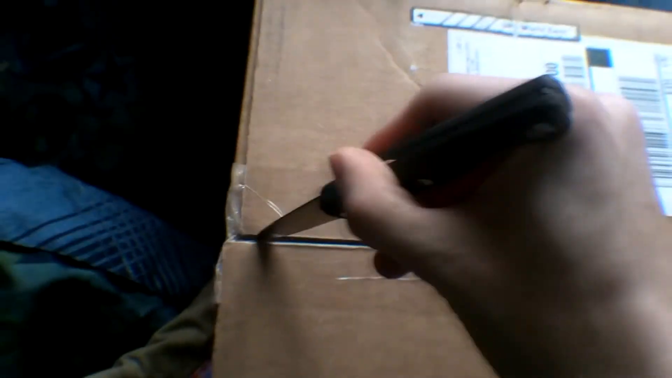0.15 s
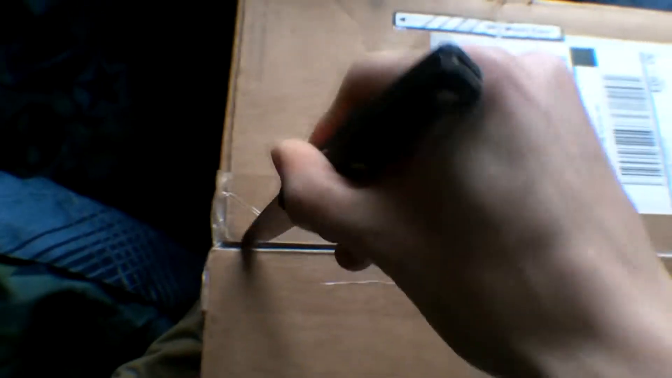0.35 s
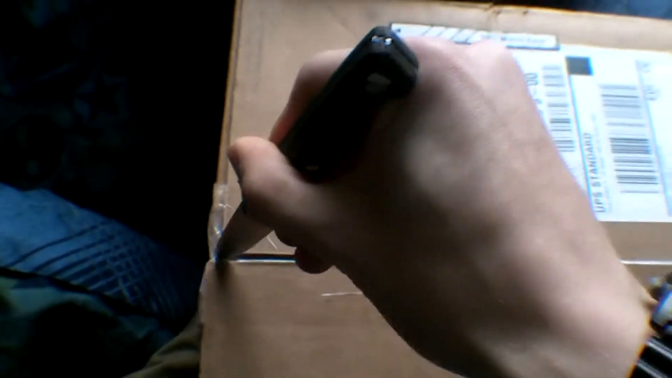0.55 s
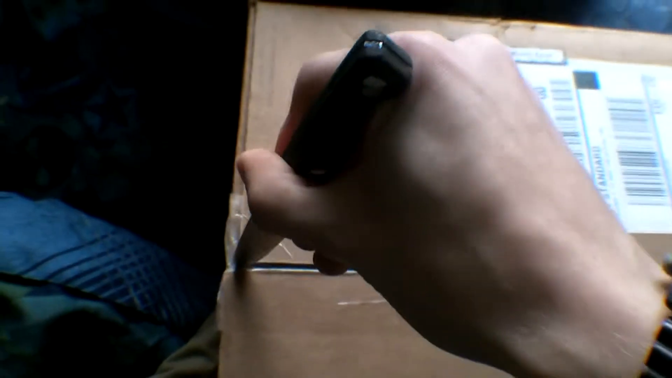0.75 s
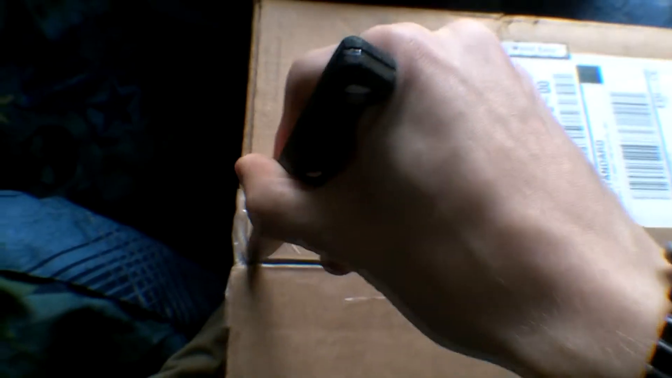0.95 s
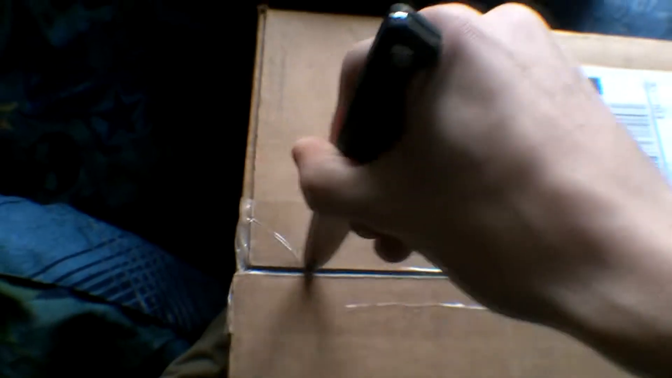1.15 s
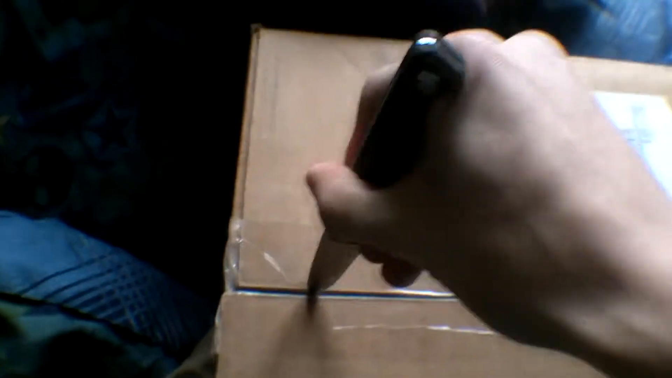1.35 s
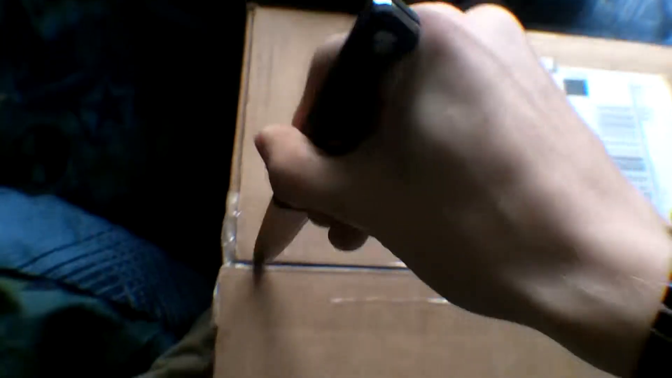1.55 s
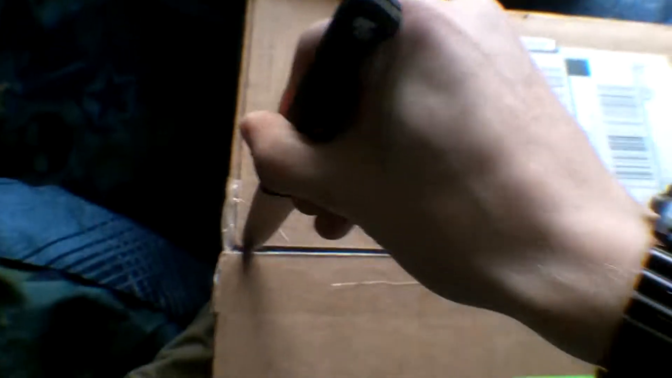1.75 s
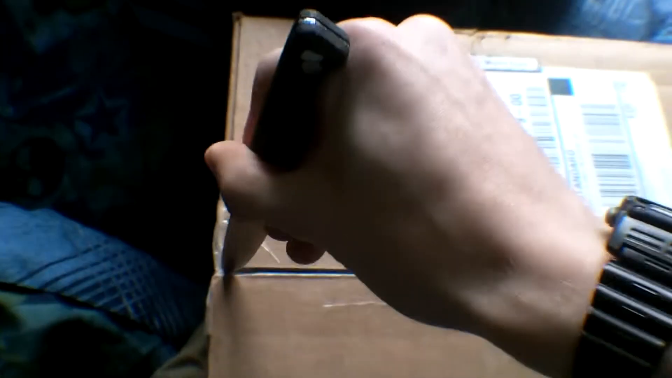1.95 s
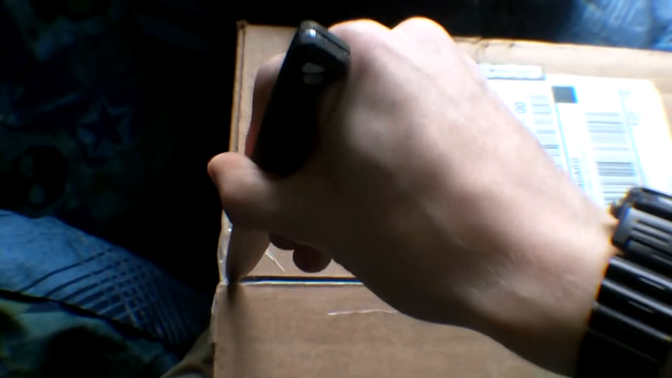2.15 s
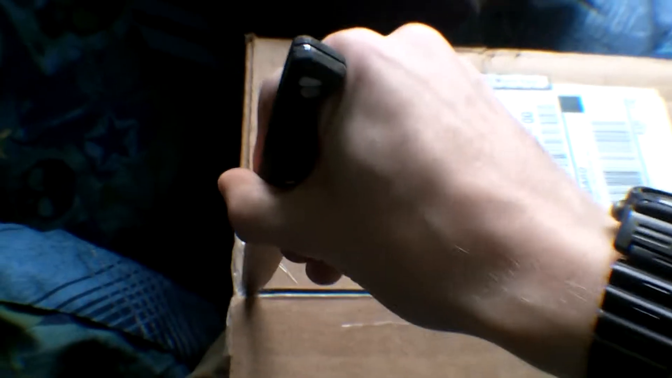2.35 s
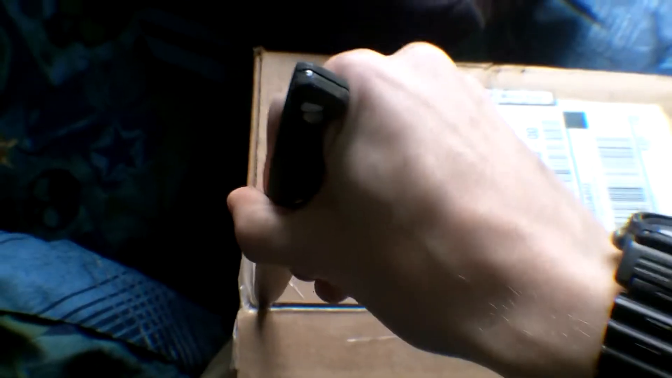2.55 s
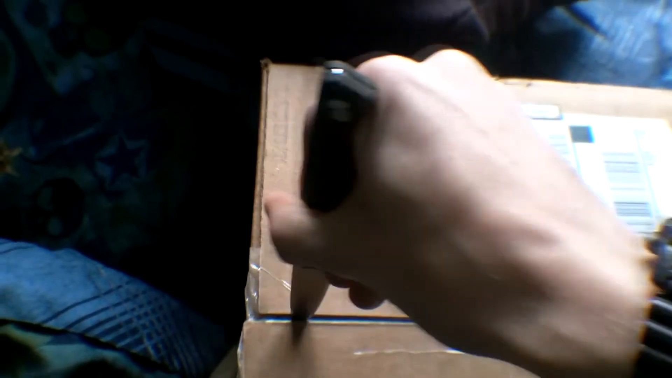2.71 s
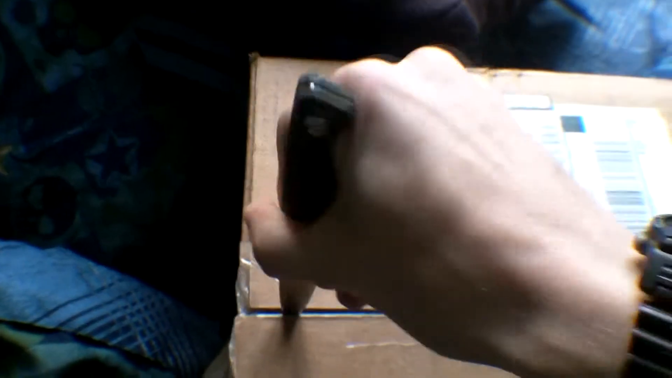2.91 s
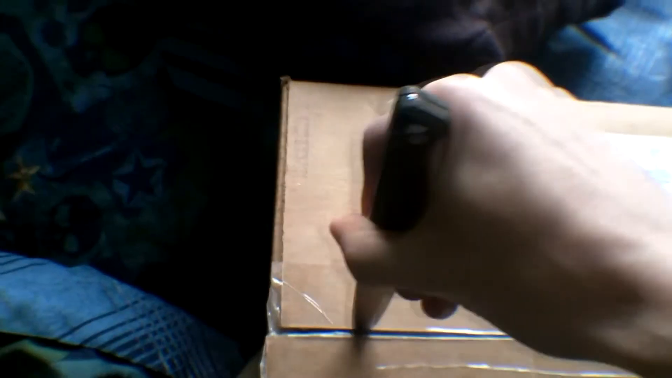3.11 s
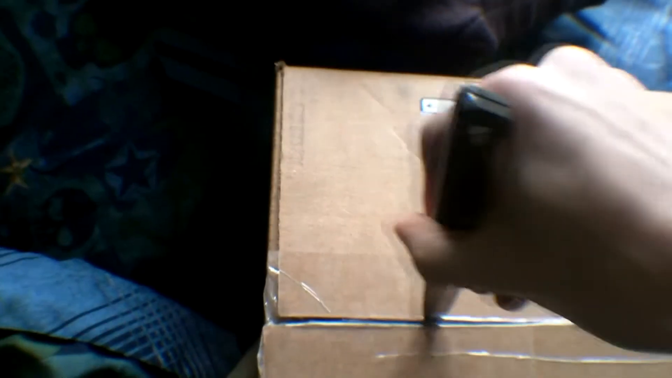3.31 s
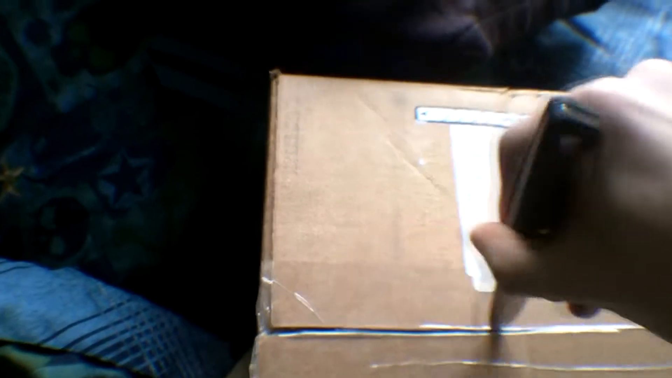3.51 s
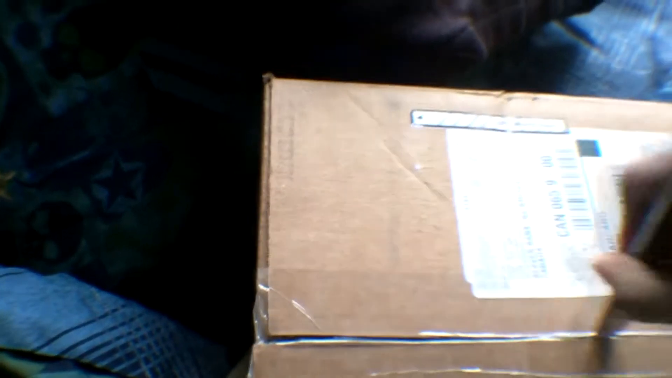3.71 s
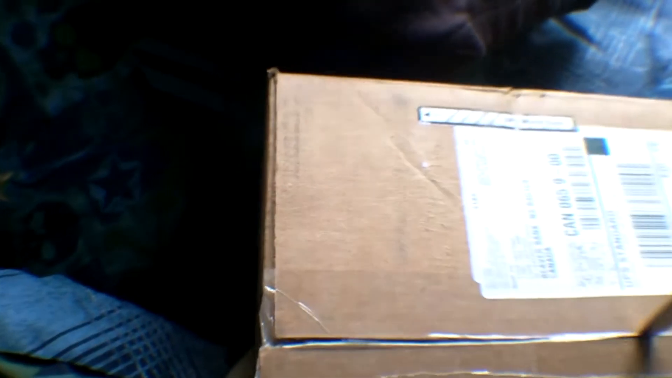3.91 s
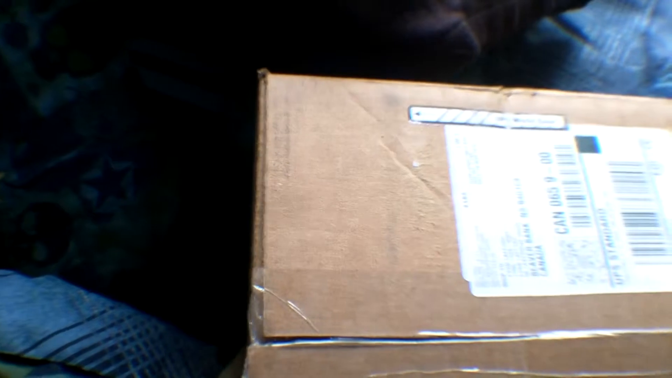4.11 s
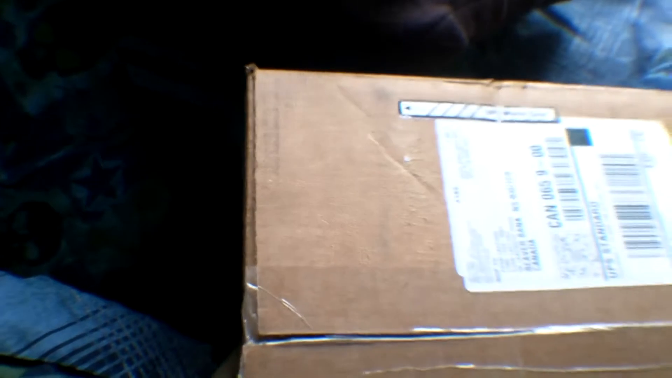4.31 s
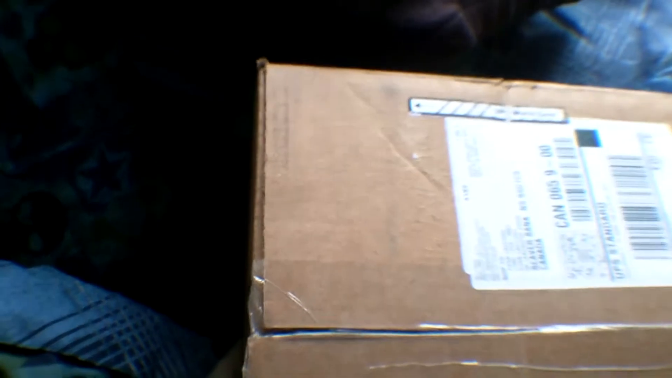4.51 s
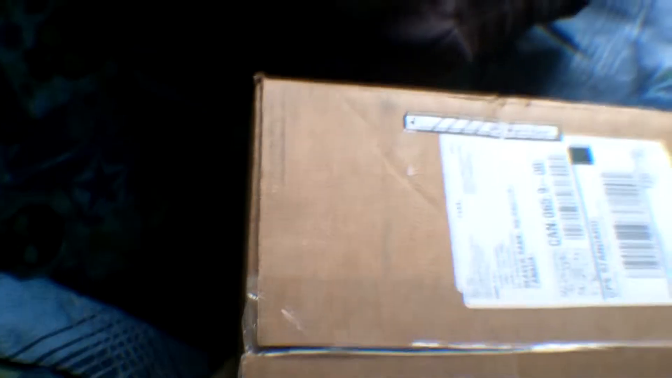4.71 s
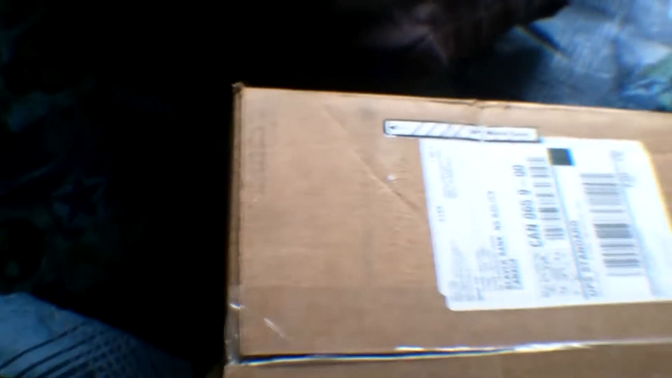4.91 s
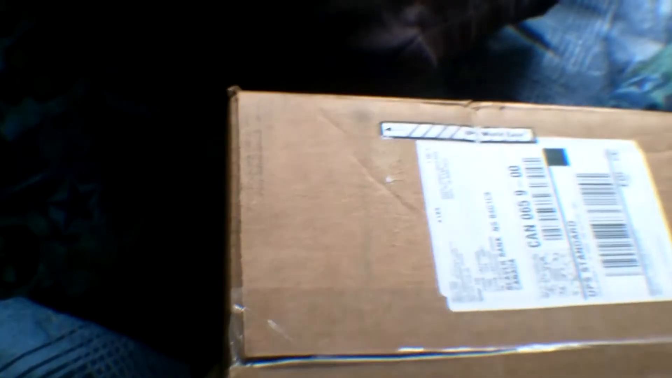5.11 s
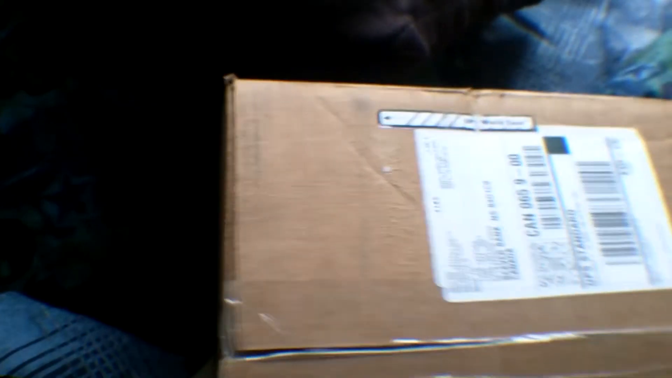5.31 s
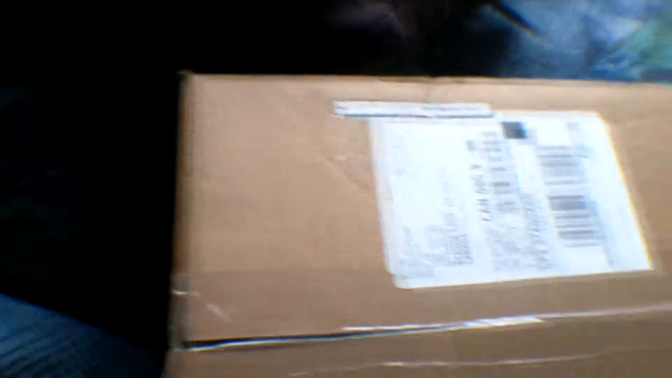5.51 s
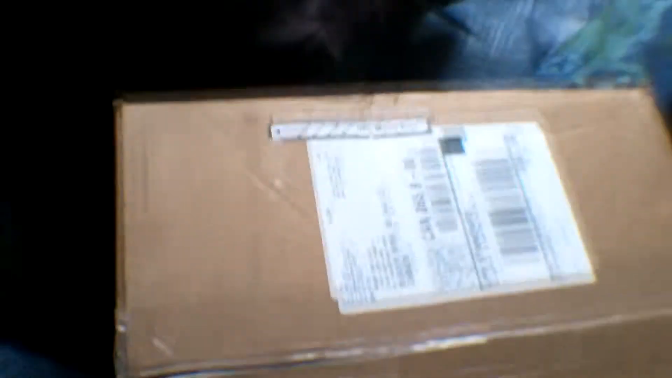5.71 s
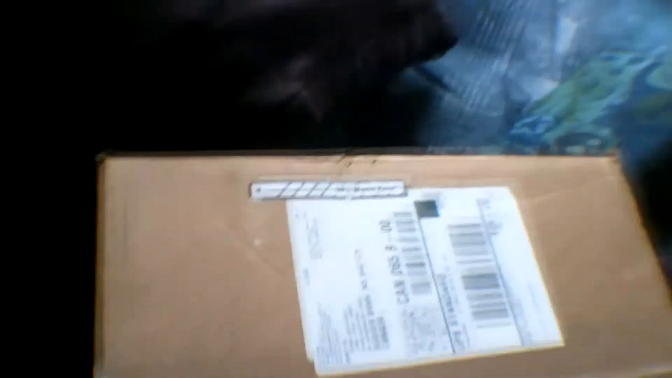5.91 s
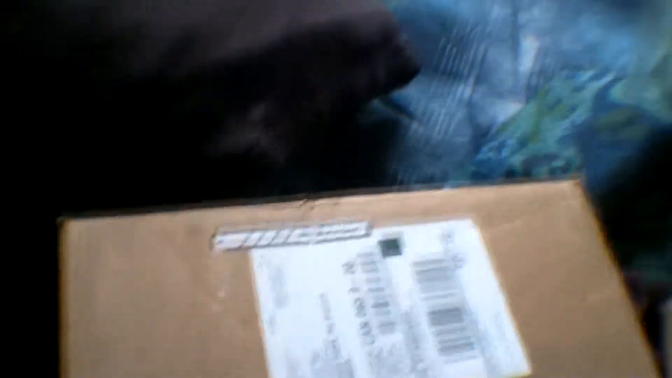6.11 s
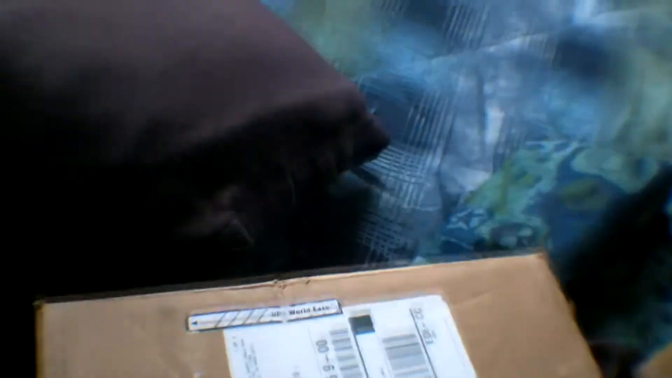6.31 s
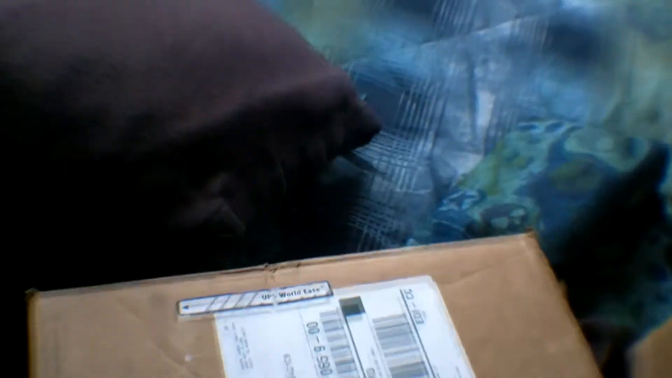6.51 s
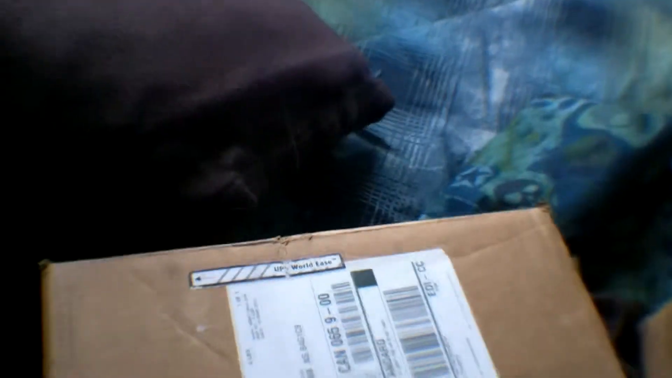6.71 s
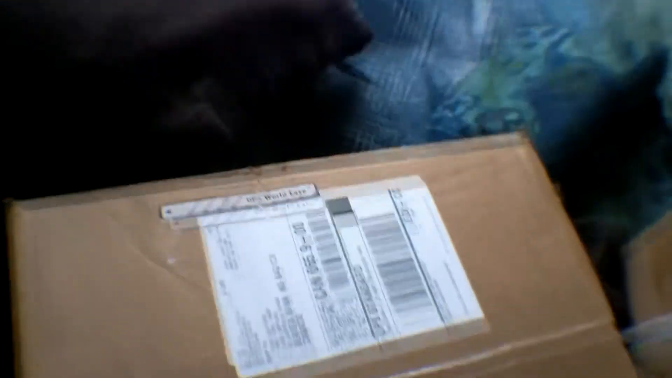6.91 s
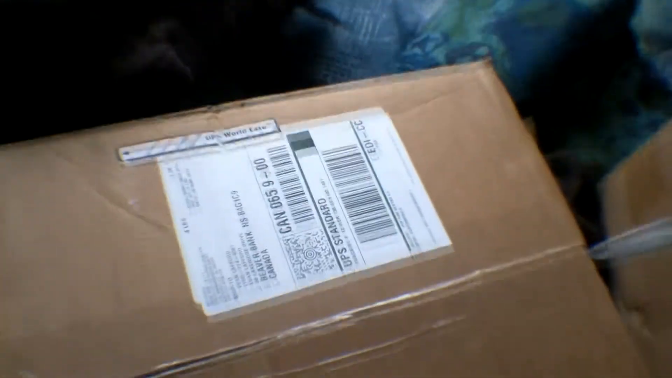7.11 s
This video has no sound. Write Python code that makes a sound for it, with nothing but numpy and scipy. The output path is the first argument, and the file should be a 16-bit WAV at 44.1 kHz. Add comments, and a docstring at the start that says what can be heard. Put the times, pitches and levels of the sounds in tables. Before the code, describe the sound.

Close and dry in a small furnished room, heard through a small bright microphone with steady soft hiss and a barely audible fan whine. At 0.1 s a quick cluster of crisp tape ticks and a small scrape, then lighter clicks around 0.5, a pair at 1.1-1.2, one sharper metallic tick at 1.6, and faint ones near 1.75 and 2.0. At 2.75 s comes the loudest event: a hard, bright snap with a hollow cardboard knock as the blade pierces. From 3.1 to 4.0 s the tape is slit in rapid, gritty crackles and rips over low panel thuds, ending in a strong pop at 4.0. From 4.3 to 5.2 s softer scuffs and rasps accompany the box shifting, with a brighter scrape at 4.7. A firm crackling knock lands at 5.4, then near quiet until small tape ticks and faint rustles from 6.5 to 7.15 s.

```python
"""Knife opening a taped cardboard box

Close by in a small soft room, a knife pokes at, pierces and slits packing tape; then the box is shifted.
Snaps of tape and dense stick-slip grains ring damped modes of the tape, the blade and the hollow box.
Panel thuds are single damped modes; behind lie shaped-noise hiss and a faint fan whine of sine tones.
A small built-in microphone colours everything with a treble peak and narrow notches."""
import sys
import numpy as np
from scipy import signal
from scipy.fft import rfft, irfft
from scipy.io import wavfile
from scipy.ndimage import uniform_filter1d

SR = 44100
rng = np.random.default_rng(int(sys.argv[2]) if len(sys.argv) > 2 else 0)


def to_wav(sig):
    """Store sig (one row per channel, or 1-D mono) as 16-bit WAV at the path in sys.argv[1].

    Samples outside -1..1 are clipped; the rate is SR.
    """
    pcm = np.clip(np.atleast_2d(sig), -1, 1) * 32767
    pcm = np.round(pcm).astype(np.int16)
    wavfile.write(sys.argv[1], SR, pcm.T)  # frames by channels


N = 315315  # samples

# resonances of the blade: pitch_hz, width_hz, relative level_db
BLADE_MODES = [(4855, 1260, 1.5), (5630, 690, -2), (6500, 1930, -0.5), (8470, 3100, -7),
               (11050, 3500, -7.5), (14400, 5000, -47)]
# resonances of the box flaps: pitch_hz, width_hz, relative level_db
FLAP_MODES = [(240, 123, -0.5), (300, 110, 4), (409, 260, 3), (573.4, 62, -2), (627, 224, -4.5),
              (1006, 310, -7), (1474, 750, -9.5)]


def gain_of(db):
    """Decibels to gain."""
    return 10 ** (np.asarray(db) / 20)


def evened(x):
    """Scales to rms 1."""
    return x / np.sqrt(np.mean(x ** 2) + 1e-20)


def read(points, hz):
    """A spectrum read on a log-frequency axis."""
    f, value = np.transpose(points)
    return np.interp(np.log(hz + 1), np.log(f + 1), value)


def add(mix, s, sound):
    """Mixes a sound in at s seconds."""
    part = mix[round(s * SR):][:len(sound)]
    part += sound[:len(part)]


def ring(modes, size=4096):
    """Impulse response of damped modes that swell in softly (steep skirts), energy 1."""
    t = np.arange(size) / SR
    body = np.zeros(size)
    for k, (hz, width, db) in enumerate(modes):
        swell_and_decay = width ** 1.5 * t * np.exp(-np.pi * width * t)
        body += (-1) ** k * gain_of(db) * swell_and_decay * np.sin(2 * np.pi * hz * t)
    return body / np.linalg.norm(body)


def background():
    """Steady hiss with a rumble, and thin tones that waver a little in level."""
    # colour of the hiss: frequency_hz, relative density_db
    hiss_colour = [(15, 28.5), (40, 24.5), (100, 11.5), (300, 8), (700, 3.5), (1600, -0.5), (4000, -1),
                   (9000, -19), (15200, -17.5), (15600, -47), (20000, -55)]
    # fan and mains tones: frequency_hz, level_db (rms)
    whine_tones = [(59.2, -61.5), (393.0, -70), (516.8, -61.5), (689.1, -76.5), (1034, -79), (1147, -71),
                   (2067, -78), (2584, -75), (3101, -73), (3618, -75.5), (4646, -79)]
    hiss_db = -50  # rms
    hz = np.fft.rfftfreq(N, 1 / SR)
    hiss = evened(irfft(rfft(rng.standard_normal(N)) * gain_of(read(hiss_colour, hz)), N))
    t = np.arange(N) / SR
    waver = 1 + 0.042 * evened(uniform_filter1d(rng.standard_normal(N), size=4000))
    tones = np.zeros(N)
    for f, db in whine_tones:
        tones += gain_of(db) * np.sqrt(2) * np.sin(2 * np.pi * (f * t + rng.random()))
    return gain_of(hiss_db) * hiss + waver * tones


def room(x):
    """Sparse reflections of random sign, each band dying at its own speed."""
    # decay of the room: frequency_hz, t60_s
    decay_times = [(100, 0.53), (500, 0.44), (1400, 0.22), (3700, 0.19), (6000, 0.26), (12000, 0.16)]
    reflections = np.zeros(SR // 2)
    slots = np.arange(150, len(reflections) - 10, 10)  # samples; one reflection falls in each
    reflections[slots + rng.integers(0, 10, len(slots))] = rng.choice([-1., 1.], len(slots))
    hz, t, bands = signal.stft(reflections, SR, nperseg=256)
    decay = gain_of(-60 * t / read(decay_times, hz)[:, None])
    tail = signal.istft(bands * decay, SR, nperseg=256)[1]
    # reflections thicken over the first moments
    tail = tail * (1 - 0.09 * np.exp(-np.arange(len(tail)) / SR / 0.0012))
    return signal.fftconvolve(x, tail / np.linalg.norm(tail))[:N]


def thuds():
    """Each thud is one blow on a cardboard panel, a single damped mode."""
    # blows on a panel: start_s, peak level_db, pitch_hz
    panel_blows = [(0.136, -40, 94.6), (.146, -34, 437), (0.545, -36, 75), (1.934, -46, 68),
                   (2.751, -28, 75.6), (2.754, -22, 310), (2.756, -28, 660), (2.7555, -16, 1000),
                   (2.768, -34, 160), (3.114, -42, 310), (3.227, -23.5, 300), (3.496, -28.5, 314),
                   (3.583, -27, 333), (3.695, -29, 260), (3.723, -22.5, 280), (3.748, -27, 196),
                   (3.82, -31, 252), (3.939, -27, 274), (3.997, -16.5, 341), (4.379, -33, 344),
                   (5.395, -21, 400), (5.398, -24, 553)]
    damping = 0.36  # width / pitch
    out = np.zeros(N)
    for s, db, hz in panel_blows:
        body = ring([(hz, damping * hz, 0)])
        add(out, s, gain_of(db) * body / abs(body).max())
    return out


def patch(hz, damping):
    """Ring of one patch of tape stretched to the pitch hz; damping is width / pitch."""
    # modes of a taut patch: multiple of its pitch, relative level_db
    patch_modes = [(.7, -9.5), (0.998, 4.5), (1.3, -5.5)]
    return ring([(hz * multiple, hz * damping, db) for multiple, db in patch_modes], size=512)


def strokes(rows):
    """Gain curves, one a level column: every stroke rises, holds and falls; overlaps add in power."""
    rise_db = 19  # climb during the rise
    lead_s = .2  # each curve begins this long before full strength
    power = np.zeros((len(rows[0]) - 4, N))
    t = np.arange(-lead_s, .4, 1 / SR)
    for s, rise, hold, fall, *levels in rows:
        climb = rise_db * np.minimum(t, 0) / max(rise, .002)
        shape = climb - fall * np.maximum(t - hold, 0)
        skip = max(round((lead_s - s) * SR), 0)  # part before the start of the scene
        for row, db in zip(power, levels):
            add(row, max(s - lead_s, 0), gain_of(2 * (db + shape[skip:])))
    return uniform_filter1d(np.sqrt(power), size=130)


def grains(per_s, spread_db):
    """Random slips of either sign: most small, a few large."""
    size = gain_of(spread_db * np.minimum(rng.exponential(1, N), 4)) * rng.choice([-1., 1.], N)
    return evened(size * (rng.random(N) < per_s / SR))


def rubs():
    """Stick-slip grains drive tape, blade and rasp together; sparser jolts drive flaps and hollow."""
    # scrapes of the edge: full_strength_s, rise_s, hold_s, fall_db_per_s, tape drive_db, blade drive_db
    scrapes = [(.112, 0.054, .004, 400, -51.5, -58), (.142, 0.022, 0.012, 203, -50, -51.5),
               (.488, 0.011, .002, 250, -53, -51), (.535, 0.017, 0.025, 260, -47.5, -55),
               (1.13, 0.046, 0.013, 146, -53, -54.5), (1.585, 0.037, 0.043, 600, -54, -52),
               (1.68, .04, 0.083, 300, -70, -63), (1.95, 0.12, 0.084, 148, -64, -64),
               (2.772, 0.027, .004, 170, -32, -37.5), (3.107, 0.0035, 0.02, 302, -35.5, -43.5),
               (3.19, 0.026, .035, 300, -47, -56), (3.236, .012, 0.0096, 500, -38, -44.5),
               (3.283, 0.054, 0.0031, 1400, -33, -45), (3.324, 0.014, .002, 450, -30, -41),
               (3.372, 0.035, .002, 248, -32, -43), (3.356, .004, .006, 900, -30, -44),
               (3.408, .005, .006, 900, -39, -48), (3.436, .003, .006, 900, -38.5, -52),
               (3.491, .004, 0.014, 900, -31.5, -47.5), (3.51, .02, 0.12, 270, -43, -52),
               (3.688, 0.0079, 0.061, 298, -38, -47), (3.795, 0.028, 0.012, 106, -45, -46.5),
               (3.902, 0.035, .002, 600, -42.5, -45), (3.938, 0.041, .002, 406, -40, -45),
               (3.998, 0.017, .002, 320, -29, -37), (4.06, .02, .11, 200, -48, -55),
               (4.288, .035, .002, 200, -53, -57), (4.382, 0.031, .002, 125, -45, -53),
               (4.478, 0.023, .002, 209, -42.5, -53), (4.58, 0.011, 0.07, 1300, -45, -51.5),
               (4.7, 0.011, 0.0076, 590, -34.5, -43), (4.8, 0.11, .054, 700, -51, -55.5),
               (4.934, 0.011, .002, 600, -48.5, -54), (5.0, .014, 0.0014, 800, -46.5, -54),
               (5.106, 0.026, 0.0017, 850, -46, -50), (5.16, 0.032, 0.0013, 600, -47.5, -52.5),
               (5.396, 0.0096, 0.0061, 1500, -27, -35.5), (5.46, .06, .04, 200, -56.5, -63.5),
               (6.686, 0.0068, 0.041, 700, -44.5, -56), (6.93, 0.18, .002, 198, -59, -58.5),
               (7.14, 0.084, .01, 300, -58, -56.5)]
    # shoves that shake the box: full_strength_s, rise_s, hold_s, fall_db_per_s,
    # flap drive_db, hollow drive_db
    shoves = [(.09, .07, 0.0092, 600, -50.5, -50), (.142, 0.012, 0.0015, 453, -41, -50),
              (.488, .01, .002, 600, -45.5, -63), (.554, 0.056, 0.0017, 402, -48.5, -56),
              (1.12, 0.031, 0.0017, 550, -41.5, -46), (1.618, 0.14, .002, 600, -54.5, -61),
              (1.77, .06, .002, 450, -55, -52.5), (1.946, 0.066, 0.035, 200, -54.5, -53.5),
              (2.058, 0.12, .002, 600, -55, -53.5), (2.68, 0.024, .01, 200, -49, -58),
              (2.755, 0.0094, 0.0026, 750, -24.5, -25), (2.78, .01, .002, 155, -39.5, -54),
              (3.108, 0.0065, 0.027, 450, -31.5, -38), (3.19, 0.023, .002, 302, -40.5, -39),
              (3.24, 0.025, .002, 600, -32, -32.5), (3.288, 0.08, 0.0016, 800, -34.5, -40),
              (3.324, 0.013, 0.0018, 300, -33.5, -31), (3.372, 0.034, 0.0022, 162, -34, -33),
              (3.495, 0.0062, 0.0017, 220, -34.5, -35.5), (3.585, 0.03, .002, 396, -37, -41.5),
              (3.696, 0.0084, 0.062, 398, -35, -39.5), (3.79, .05, 0.036, 280, -38.5, -46),
              (3.902, 0.081, .01, 300, -43, -60), (3.938, 0.011, 0.0023, 280, -37, -37),
              (3.998, 0.045, 0.0027, 296, -23.5, -34.5), (4.056, 0.075, 0.081, 181, -41, -41.5),
              (4.288, 0.036, .002, 280, -44.5, -49), (4.376, 0.011, .006, 160, -38.5, -41),
              (4.47, 0.032, 0.0048, 350, -40.5, -52), (4.58, .03, 0.069, 900, -47.5, -55),
              (4.7, 0.022, 0.016, 604, -42, -43), (4.772, 0.023, .002, 250, -44, -48),
              (4.854, .08, 0.0022, 600, -43.5, -51.5), (4.934, .02, .002, 250, -48.5, -63),
              (5.0, .022, .002, 550, -41.5, -51), (5.106, 0.011, .002, 1000, -41.5, -45),
              (5.16, 0.029, 0.0017, 600, -43.5, -46), (5.394, 0.0084, 0.013, 498, -28, -40),
              (6.554, 0.05, .002, 600, -51.5, -47), (6.704, 0.056, .01, 450, -51, -51),
              (6.824, 0.088, .002, 250, -54.5, -49.5), (7.078, 0.027, .002, 600, -57, -43.5)]
    # airy rasps while the box slides: full_strength_s, rise_s, hold_s, fall_db_per_s, drive_db
    rasps = [(4.49, 0.035, .002, 530, -54), (4.591, 0.018, .002, 182, -48.5),
             (4.71, 0.016, 0.0033, 1250, -37), (4.838, 0.023, .002, 622, -51)]
    # resonances of the rasp: pitch_hz, width_hz, relative level_db
    rasp_modes = [(5200, 900, -3), (5500, 410, 3)]
    # resonances of the hollow box: pitch_hz, width_hz, relative level_db
    hollow_modes = [(62.5, 38.8, -7), (85, 82, -9), (116.5, 53, -1.5), (157, 54, -4.5)]
    # patches of tape rubbed at random: pitch_hz, level_db
    rubbed_patches = [(1700, -8.5), (2050, -4), (2400, 1), (2750, -8), (3100, 1.5), (3500, 0.5),
                      (3900, -1.5)]
    slide_s = 4.25  # the box starts to slide on cloth
    cut_grain, slide_grain = 0.81, 0.66  # weight of separate slips against even hiss
    fizz_cut_db, fizz_slide_db = -13.5, -11  # upper blade modes against the lower

    tape, blade = strokes(scrapes)
    flap, hollow = strokes(shoves)
    rasp, = strokes(rasps)
    sliding = np.arange(N) > slide_s * SR

    # slips come in bunches
    clumps = gain_of(3.9 * evened(uniform_filter1d(rng.standard_normal(N), size=250)))
    coarse = evened(clumps * grains(per_s=7000, spread_db=4))
    grain = np.where(sliding, slide_grain, cut_grain)
    slips = grain * coarse + np.sqrt(1 - grain ** 2) * rng.standard_normal(N)
    jolts = evened(grains(per_s=830, spread_db=3.5) + 0.43 * slips)

    out = np.zeros(N)
    place = rng.integers(0, len(rubbed_patches), N)  # each slip rings one patch of tape
    for k, (hz, db) in enumerate(rubbed_patches):
        out += gain_of(db) * signal.oaconvolve(tape * slips * (place == k), patch(hz, 0.31))[:N]

    fizz = gain_of(np.where(sliding, fizz_slide_db, fizz_cut_db))
    parts = ((blade * slips, BLADE_MODES[:3]),
             (fizz * blade * slips, BLADE_MODES[3:]),
             (rasp * slips, rasp_modes),
             (flap * jolts, FLAP_MODES),
             (hollow * jolts, hollow_modes))
    for drive, modes in parts:
        out += signal.oaconvolve(drive, ring(modes))[:N]
    return out


def snap_blade(sharp_db):
    """Blade ring of one snap: a sharp blow lifts the upper modes over the lowest."""
    top_db = -3.5  # extra level of the modes above the third
    lowest_hz = BLADE_MODES[0][0]
    modes = []
    for k, (hz, width, db) in enumerate(BLADE_MODES):
        lift_db = sharp_db * min(np.log2(hz / lowest_hz), .45)
        modes.append((hz, width, db + lift_db + top_db * (k > 2)))
    return ring(modes, size=256)


def snap_flap():
    """Flap ring of a snap, which is too quick for the lower modes and favours the upper ones."""
    tilt_db = 3  # per octave
    modes = [(hz, width, db + tilt_db * np.log2(hz / 1000)) for hz, width, db in FLAP_MODES[-3:]]
    return ring(modes, size=1024)


def ticks():
    """A short rattle of force that swells and dies, with one strong break at its peak,
    rings tape, blade and flap; returns direct sound and room feed."""
    # single snaps and ticks: start_s, tape peak level_db, pitch_hz of the taut patch,
    # blade peak level_db, blade sharpness_db_per_octave, flap peak level_db, length_ms
    snaps = [(0.1311, -20, 3120, -26.5, -38, -59, 0.63), (0.1451, -29, 3020, -23, -15, -59, 1.4),
             (0.1507, -17, 3700, -24, -12, -38, 1.54), (0.1554, -14, 3500, -20.5, -6, -58, 0.23),
             (0.2325, -36.5, 2780, -46, -10, -57, 0.89), (0.4875, -27.5, 2720, -16.5, 12, -34, 0.48),
             (0.54, -32, 3400, -28, 0, -53, 1.8), (0.5543, -42, 1790, -32, 1, -34.5, 2.63),
             (0.5662, -29, 3800, -22.5, 32, -38, 0.99), (1.1279, -20.5, 2870, -26, 5, -58, 1.04),
             (1.1348, -22.5, 2630, -42, 9, -45, 3.7), (1.1394, -41, 3170, -18.5, 10, -54, 0.48),
             (1.2041, -18, 3330, -19.5, 4, -45, .68), (1.209, -27, 3480, -21.5, 10, -47, 0.69),
             (1.5427, -42, 3500, -44, 8, -51, 1.4), (1.605, -34, 3500, -34, -3, -43, 0.85),
             (1.6218, -19, 3520, -11, -28, -49, 0.88), (1.632, -43, 3600, -29, -25, -54, 4.4),
             (1.755, -33, 3400, -16.5, 10, -65, 0.32), (2.0071, -28.5, 3750, -27, 6, -38, 0.17),
             (2.644, -27.5, 3030, -30, 6, -59, 1.4), (2.7317, -24.5, 3670, -34, 0, -40, 1.34),
             (2.7539, -6, 3310, -2.5, -3, -13, 1.4), (2.7554, -10, 2390, -31, 8, -27, .6),
             (2.7611, -17, 3320, -14, -19, -19, 0.34), (3.202, -26, 2450, -29, -3, -35, 4.5),
             (3.2285, -13.5, 2320, -20, -12, -37, 2.2), (3.2315, -9, 3350, -10, -11, -20.5, 0.5),
             (3.2415, -32, 3000, -35, -20, -47, 1.6), (3.2563, -27, 2800, -38, -5, -45, 1.2),
             (3.2695, -18, 3270, -30, -4, -44, 1.8), (3.2857, -15, 1930, -30, -10, -28, 1.92),
             (3.318, -13.5, 3200, -31, 4, -36, 2.1), (3.3212, -9.5, 2950, -17.5, 6, -25.5, 1.17),
             (3.3255, -14.5, 2180, -37, -11, -44, 2.2), (3.3552, -17.5, 3230, -31, 9, -38, 3.2),
             (3.3864, -18.5, 3000, -49, -17, -55, 2.3), (3.4069, -18, 2860, -33, -2, -35, 1),
             (3.4352, -21, 3000, -34, 8, -45, .6), (3.496, -19, 2800, -34, -5, -34, 5.5),
             (3.502, -13, 3100, -35, 1, -36, 2.12), (3.558, -19, 2950, -43, 3, -53, 0.17),
             (3.7983, -30, 2700, -31, 3, -48, 1), (3.8293, -13.5, 2800, -35, -12, -29.5, 0.64),
             (3.8369, -18, 2800, -27, -23, -32, 0.41), (3.8823, -33.5, 2090, -33, -6, -44, 2.3),
             (3.9265, -29, 1890, -34, 3, -41, 1.5), (3.9355, -13.5, 2950, -15, -15, -30, .39),
             (3.9779, -25, 2080, -27, -8, -51, 2.5), (3.9827, -16.5, 2970, -29, 3, -27, 1.64),
             (3.9989, -14.5, 1970, -30, -5, -29, 1.28), (4.0006, -16, 2530, -19.5, -14, -13.5, 1.9),
             (4.0089, -13.5, 2830, -23, 1, -39, 1.06), (4.0185, -43, 2960, -26, -3, -46, 1.8),
             (4.12, -32, 3200, -52, -8, -53, .3), (4.7171, -26.5, 2830, -35, -12, -28.5, 1.08),
             (4.7713, -23, 3300, -15.5, 11, -33, 0.61), (4.7741, -23.5, 2300, -25, 4, -39, 0.64),
             (5.2184, -35, 3070, -36, -36, -60, 2.1), (5.3658, -50, 2560, -40, -18, -59, .87),
             (5.3834, -45, 2500, -37, 0, -60, 1.05), (5.3875, -32, 2600, -30, -19, -43, 2.6),
             (5.3911, -14, 2970, -24, -22, -25, 4.05), (5.3955, -12.5, 2600, -37, 13, -24, 2.08),
             (5.3987, -13, 2240, -13.5, -6, -33, 0.37), (5.4025, -16, 2260, -21, -12, -22, 1.75),
             (6.5437, -32, 2860, -44, -4, -54, .6), (6.551, -18, 2450, -29.5, -6, -60, 2.2),
             (6.687, -36, 2420, -30, -16, -61, 2.7), (6.715, -22, 2750, -33, -21, -48, .17),
             (6.7232, -32, 2760, -39, 1, -41.5, 1.6), (6.7972, -14, 3000, -22, -10, -57, 0.19),
             (6.8062, -18.5, 3430, -26, -13, -60, 0.35), (6.8875, -26, 2760, -19.5, 11, -61, .52),
             (6.921, -33.5, 2540, -36.5, -32, -65, 1.8), (6.9547, -31.5, 3620, -49, -21, -53, 0.95),
             (6.9608, -37, 2840, -49, -17, -64, 1.12), (6.976, -38, 3550, -39, 1, -56, 0.44),
             (7.1475, -31, 2900, -23.5, -8, -56, 0.27)]
    hard_db = -18.5  # snaps harder than this ring the tape longer and purer, by damping_per_db
    damping_base, damping_per_db = 0.25, -0.01  # width / pitch of a patch
    thrown_base_db, thrown_per_db = -12, 0.42  # share thrown into the room; more for harder snaps

    near, far = np.zeros(N), np.zeros(N)
    t_ms = np.arange(256) / SR * 1000
    flap = snap_flap()
    for s, tape_db, hz, blade_db, sharp_db, flap_db, ms in snaps:
        excess_db = max(tape_db - hard_db, 0)
        swell = (t_ms / ms) ** .9 * np.exp(-(t_ms / ms / 0.73) ** 2)
        force = rng.standard_normal(256) * swell / np.linalg.norm(swell)
        force[np.argmax(swell)] = 0.87  # the strong break keeps the colour even
        tape = patch(hz, damping_base + damping_per_db * excess_db)
        thrown = gain_of(thrown_base_db + thrown_per_db * excess_db)
        for body, db in ((tape, tape_db), (snap_blade(sharp_db), blade_db), (flap, flap_db)):
            sound = np.convolve(force, body)
            sound = gain_of(db) * sound / abs(signal.hilbert(sound)).max()
            add(near, s, sound)
            add(far, s, thrown * sound)
    return near, far


def scene():
    """Knife and box close by, their room tail, and the background."""
    snaps, thrown = ticks()
    rubbed = rubs() + thuds()
    tail = room(thrown + gain_of(-16.5) * rubbed)
    return (snaps + rubbed + tail + background())[None]


def record(dry):
    """Causal microphone colour with notches from the housing, peaks held below full scale; then the band limit."""
    # microphone response: frequency_hz, level_db
    mic_response = [(20, -3.5), (3600, 0.5), (4550, 2.5), (4900, 7), (5200, 2), (5800, 3.5), (6400, 2),
                    (7200, -6), (8300, -7), (9800, 0.5), (15000, 0)]
    # centres of the housing notches: frequency_hz
    notch_centres = [4200, 7850, 8750, 12600]
    # shape of each notch, in the same order: width_hz, depth_db
    notch_shapes = [(260, -26), (310, -33), (237, -49), (210, -16)]
    edge_hz = 16500  # band limit
    hz = abs(np.fft.fftfreq(8192, 1 / SR))
    gain = gain_of(read(mic_response, hz))
    for f, (width, db) in zip(notch_centres, notch_shapes):
        floor = (width * gain_of(db)) ** 2
        gain = gain * np.sqrt(((hz - f) ** 2 + floor) / ((hz - f) ** 2 + width ** 2))
    # minimum phase: the response starts at once, with no ringing ahead
    log = np.log(gain)
    mic = np.fft.ifft(np.exp(log - 1j * signal.hilbert(log).imag)).real[:2048]
    heard = signal.oaconvolve(dry, mic[None])[:, :N]
    heard = np.clip(heard, -.93, .93)  # peaks held below full scale
    band = signal.firwin(511, edge_hz, window=("kaiser", 9), fs=SR)
    return signal.oaconvolve(heard, band[None], "same")


dry = scene()
out = record(dry)
to_wav(out)
```